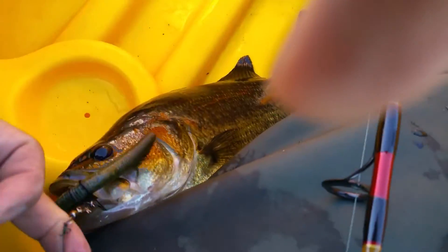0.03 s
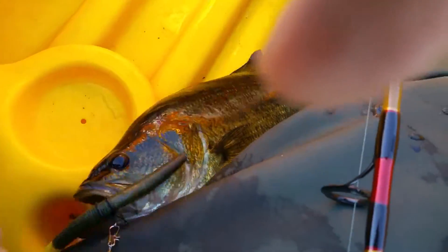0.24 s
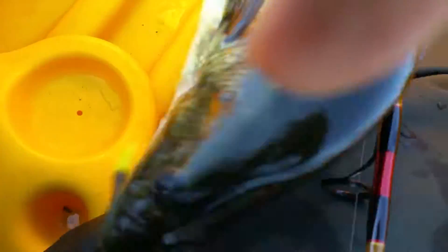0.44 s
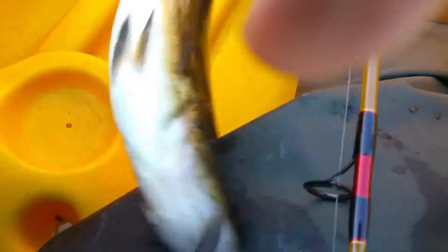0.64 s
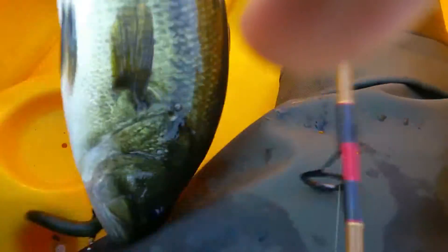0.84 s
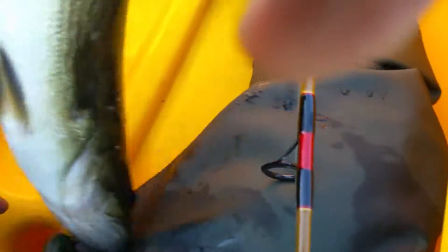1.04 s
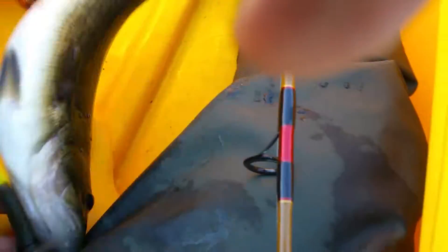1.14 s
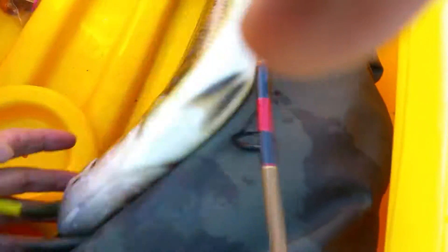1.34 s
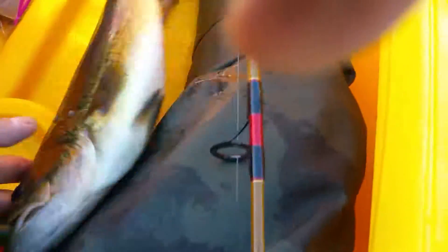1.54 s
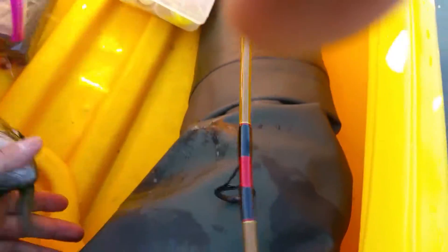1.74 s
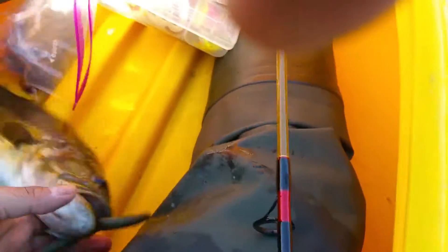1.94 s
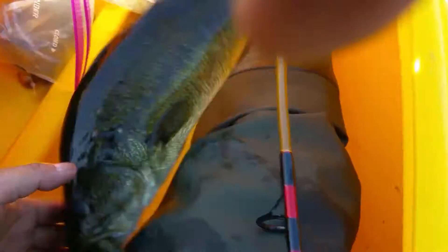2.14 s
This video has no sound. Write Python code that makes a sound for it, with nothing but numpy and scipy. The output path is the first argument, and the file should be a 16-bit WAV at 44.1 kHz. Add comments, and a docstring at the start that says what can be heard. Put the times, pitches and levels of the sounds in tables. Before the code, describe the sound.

A freshly caught fish thrashes, slapping wetly and thumping against a hollow plastic kayak hull

```python
"""Cockpit of a plastic kayak on a lake: a freshly caught fish thrashes close to the microphone. Its wet body
slaps the deck (crackling noise bursts) and thumps the hollow hull (low modes, rumble). Sharp knocks ring the
deck (tone, narrow noise); the lure clacks on it (short modes, echo). Between blows it slithers over rubber
waders (grainy wet noise) and squeaks (falling tones). Faint lake air (steady noise) and small water drips
(short rings) lie underneath."""
import sys
import numpy as np
from scipy import signal
from scipy.fft import rfft, irfft
from scipy.io import wavfile

SR = 44100
rng = np.random.default_rng(int(sys.argv[2]) if len(sys.argv) > 2 else 0)


def dump(signal):
    """Clip the signal to [-1, 1] and save it as 16-bit WAV at the path in sys.argv[1]."""
    limited = np.clip(np.atleast_2d(signal).T, -1, 1)
    pcm = np.round(limited * 32767).astype(np.int16)
    wavfile.write(sys.argv[1], SR, pcm)


N = 96402
TIME_S = np.arange(N) / SR
CUTOFF_HZ = 16000

# Stereo pickup. Each row: frequency in Hz, left-right correlation from -1 to 1.
STEREO_CORRELATION = [(60, 0.97), (200, 0.96), (400, 0.93), (750, 0.67), (1400, -0.23), (2800, -0.056),
                      (6000, -0.065), (16000, 0.19)]
# Channel balance. Each row: frequency in Hz, left minus right in dB.
MIC_BALANCE = [(200, 1), (700, 6), (1300, 0), (2400, -6.5), (4400, 6), (8000, 12), (15000, 1)]

# Lake air spectrum. Each row: frequency in Hz, relative density in dB per Hz.
AIR_COLOUR = [(25, -79), (55, 9.5), (100, 6.5), (180, 2.5), (300, -8), (850, -8), (1400, -12.5),
              (3000, -23.5), (6500, -27), (8500, -39), (16000, -32.5)]
AIR_DB = -39
DRIPS_PER_S, DRIP_DB, DRIP_T60_CYCLES = 54, -52, 14

# Strokes of the slithering fish. Each row: start in seconds, level in dB, swell in seconds,
# t60 in seconds, hiss gain above 3 kHz in dB.
SLITHERS = [(-.01, -37.5, .01, 0.34, -1), (.16, -43.5, 0.21, 0.71, -26), (0.391, -37.5, 0.006, 0.9, 1),
            (0.409, -26.5, 0.054, 0.24, 0.5), (0.506, -33, 0.026, 0.026, -18), (0.679, -43, 0.012, 0.47, 4),
            (0.838, -25, 0.006, 0.51, 0.5), (0.997, -26, 0.013, 0.054, 1), (1.12, -42, 0.057, 0.94, 0),
            (1.283, -34, 0.0023, 0.32, -8), (1.317, -26, 0.034, 0.38, 3.5), (1.683, -28.5, 0.034, 0.66, -7),
            (1.85, -41, 0.031, 0.47, 10), (1.975, -35, 0.0034, 0.19, 12), (1.997, -34.5, 0.018, 0.45, 8),
            (2.048, -32.5, 0.041, 0.12, 12.5)]
# Rubbing spectrum, also used for the knocks. Each row: frequency in Hz, relative density in dB per Hz.
SLITHER_COLOUR = [(60, -26), (200, 8.5), (450, -1), (850, -2), (1200, -6), (2300, -6), (3800, -14),
                  (6500, -16.5), (8200, -28.5), (16000, -25.5)]
GRAINS_PER_S, GRAIN_DECAY_S, GRAIN_SPREAD_DB = 600, 0.0015, 4.5
SLITHER_GRAIN_SHARE, SLAP_GRAIN_SHARE = 0.69, 0.28  # of power
BUBBLES_PER_S, BUBBLE_Q, BUBBLE_SHARE = 260, 9, 0.6  # rate per pitch; share of power

# Wet skin squeaks. Each row: start in seconds, level in dB, start pitch in Hz, end pitch in Hz,
# length in seconds.
SQUEAKS = [(0.816, -32, 803, 447, 0.022), (1.36, -32.5, 2000, 1550, 0.0274),
           (2.063, -20.5, 4270, 1477, 0.018)]

# Knocks and rings of the deck. Each row: start in seconds, level in dB, pitch in Hz, t60 in seconds.
KNOCKS = [(.602, -29, 1893, 0.067), (0.758, -24.5, 374, 0.1), (.802, -14, 870, 0.077),
          (.803, -16, 554, 0.085), (.837, -18.5, 500, 0.069), (.897, -21, 393, 0.1),
          (1.0035, -17, 695, 0.033), (1.004, -14.5, 265, 0.057), (1.108, -30.5, 389, 0.068),
          (1.287, -10.5, 380, 0.025), (1.354, -28, 528, 0.1), (1.396, -28, 462, 0.19),
          (1.385, -24, 856, 0.015), (1.402, -21, 2028, 0.1), (1.439, -14, 860, 0.018),
          (1.502, -21.5, 2054, 0.097), (1.707, -26.5, 1140, 0.03), (1.732, -13.5, 907, 0.044),
          (1.735, -15, 1200, 0.037), (1.788, -23, 433, 0.1), (2.068, -19, 397, 0.16)]
KNOCK_RISE_S, KNOCK_Q, KNOCK_TONE_DB, KNOCK_CLUSTER_DB = 0.0012, 1.8, -3.5, -9

# Lure hitting the deck. Each row: start in seconds, level in dB.
CLACKS = [(0.5651, -4), (0.6609, -5.5), (.7530, -7.5), (0.9843, -8.5), (1.108, -34), (1.1585, -40),
          (1.435, -14.5), (1.602, -17), (1.8730, -19)]
# Modes of the lure. Each row: frequency in Hz, level in dB, t60 in seconds.
LURE_MODES = [(1836, -21.5, 0.066), (2180, -16.5, 0.047), (2740, -17, 0.056), (2646, -7, 0.019),
              (2960, -11.5, 0.0034), (4730, -17, 0.013), (5800, -27, 0.013)]
# Cockpit's answer to a clack. Each row: frequency in Hz, relative density in dB per Hz.
CLACK_ECHO_COLOUR = [(120, 1), (250, 17), (390, 2), (600, 1.5), (1200, -9), (1850, 0.5), (2700, 6),
                     (4200, -3.5), (6500, -3.5), (8200, -24), (16000, -30)]
CLACK_RISE_S, CLACK_PAN_DB = 0.0006, -15
CLACK_ECHO_DB, CLACK_ECHO_T60_S, CLACK_SNAP_DB, CLACK_SNAP_T60_S = -11, 0.081, -26, 0.006

# Body landing on the hull. Each row: start in seconds, level in dB, pitch in Hz, hold in seconds.
THUMPS = [(0.401, -19.5, 78, 0.0093), (0.467, -20, 84, 0.0052), (.572, -23, 178.6, 0.047),
          (.663, -26.5, 147.4, 0.062), (0.752, -27, 132, .003), (.804, -16, 182.8, .003),
          (.834, -9, 135.4, 0.022), (.906, -7.5, 159.1, 0.0068), (.94, -23.5, 136, .003),
          (1, -20.5, 144.5, .006), (1.293, -16.5, 112.4, 0.0049), (1.359, -16.5, 122.5, 0.0024),
          (1.402, -14.5, 162.8, 0.017), (1.478, -18.5, 117, 0.0024), (1.502, -18, 159.5, 0.015),
          (1.612, -27.5, 132, 0.0054), (1.732, -11, 184, 0.011), (1.758, -12, 117.6, .004),
          (1.790, -8, 155, 0.017), (1.894, -33.5, 130, .02), (2.081, -11.5, 192, 0.016),
          (2.098, -14.5, 124, 0.0039)]
# Modes of the hull. Each row: multiple of the thump's pitch, level in dB.
HULL_MODES = [(0.598, -8), (0.801, -14.5), (0.999, -1.5), (1.351, -15.5), (2.5, -26.5)]
# Loose hull rumble. Each row: frequency in Hz, relative density in dB per Hz.
SHUDDER_COLOUR = [(25, -38), (45, -33), (75, 3), (190, 1.5), (290, -10), (430, -11.5), (700, -45.5),
                  (1500, -51.5)]
HULL_RISE_S, HULL_T60_S, HULL_PAN_DB = 0.008, 0.14, 2.5
SHUDDER_DB, SHUDDER_T60_S = -15, 0.42

# Wet slaps. Each row: start in seconds, level in dB, sizzle gain at 3.6-7.2 kHz in dB,
# spray gain above 7.2 kHz in dB, rise in seconds, t60 in seconds, pan as left minus right in dB,
# pitch of the struck panel in Hz.
SLAPS = [(0.8, -9, -3, -1.5, 0.0031, 0.068, -0.5, 2213), (0.8297, -20, 2, -1, 0.005, 0.063, -2.5, 2720),
         (0.877, -20.5, -9, -6, 0.0007, 0.053, 8, 2160), (0.8844, -7.5, 0, -5, 0.00038, 0.039, -1, 2051),
         (0.895, -7.5, 1, -10, 0.00077, 0.057, -2.5, 2645), (0.9197, -20, 7.5, 3, 0.0004, 0.083, -4, 2550),
         (1.3318, -28, 2.5, 11, 0.00083, 0.05, 1.5, 2750), (1.3494, -15, 0.5, -3, 0.0054, 0.051, -2, 1693),
         (1.3950, -15, 0.5, -9, 0.0016, 0.11, -2, 1600), (1.404, -23, -8, 0, 0.0012, 0.097, -4, 2600),
         (1.4552, -22, -4.5, -20, 0.0019, 0.068, -1, 2800), (1.4916, -16, -1, 0, 0.002, 0.029, -3, 1758),
         (1.499, -19, 5, -0.5, 0.0016, 0.07, -1, 2080), (1.677, -26, -6.5, -9.5, 0.0072, 0.055, -1.5, 2495),
         (1.7160, -45.5, 14.5, 18, 0.0031, 0.14, 6, 3780), (1.7312, -9.5, -2, -2, 0.00058, 0.057, 0, 2250),
         (1.781, -12, 2, -3.5, 0.003, 0.13, -1.5, 1604), (1.8900, -24.5, 0.5, -1, 0.0022, 0.077, 0.5, 2980),
         (2.0643, -17, 6, 4, 0.00083, 0.092, -5, 2570), (2.086, -21.5, -1.5, -20, 0.0092, 0.13, -3, 1770),
         (2.1290, -22.5, 3, -2.5, 0.00075, 0.082, -5.5, 2800)]
# Slap spectrum. Each row: frequency in Hz, relative density in dB per Hz.
SLAP_COLOUR = [(150, 2), (400, -6.5), (900, -8.5), (1300, -7), (1650, 0.5), (2200, -1), (2650, 0),
               (3900, -4), (5000, -5), (6600, -4), (8000, -13.5), (16000, -12)]
CRACK_DB, CRACK_T60_S = -17, 0.031  # first instant of contact
PANEL_DB, PANEL_T60_S, SPRAY_T60_RATIO = -13, 0.072, 0.77


def from_db(db):
    """Amplitude gain of a level in dB."""
    return 10 ** (np.asarray(db) / 20)


def rms_one(x):
    """Scale to rms 1."""
    return x / np.sqrt(np.mean(x ** 2) + 1e-20)


def at_hz(points, hz):
    """Interpolate a table on a log-frequency axis."""
    table = np.array(points)
    return np.interp(np.log(hz + 1e-9), np.log(table[:, 0]), table[:, 1])


def pan(left_minus_right_db):
    """Constant-power left and right gains."""
    gains = np.vstack([from_db(left_minus_right_db / 2), from_db(-left_minus_right_db / 2)])
    return gains / np.sqrt(np.mean(gains ** 2, axis=0))


def treble(x, hz):
    """Part of a sound above a frequency, without phase shift."""
    return signal.sosfiltfilt(signal.butter(4, hz, "high", fs=SR, output="sos"), x)


def blow(start_s, rise_s, t60_s, hold_s=0):
    """Envelope of a blow: smooth rise, hold, exponential decay."""
    age_s = TIME_S - start_s
    rise = np.sin(np.pi / 2 * np.clip(age_s / rise_s, 0, 1)) ** 2
    decay = np.exp(-np.log(1000) * np.clip((age_s - rise_s - hold_s) / t60_s, 0, 2))
    return rise * decay


def ring(start_s, hz, rise_s, t60_s):
    """One struck mode: a decaying sine."""
    return np.sin(2 * np.pi * hz * (TIME_S - start_s)) * blow(start_s, rise_s, t60_s)


def bubbles(pitches=30):
    """Water film bursting into tiny bubbles: random pops excite resonances; even spectrum, rms 1."""
    out = 0
    for hz in np.geomspace(300, CUTOFF_HZ, pitches):
        chance = rng.uniform(-1, 1, (2, N))
        pops = np.sign(chance) * (np.abs(chance) < BUBBLES_PER_S / SR)
        resonance = signal.iirpeak(hz, BUBBLE_Q, fs=SR)
        out = out + np.sqrt(hz) * rms_one(signal.lfilter(*resonance, pops + 1e-18))
    return rms_one(out)


def noise(colour, wet=False):
    """Coloured noise as two microphones hear it, smooth or wet with bubbles; rms 1."""
    hz = np.arange(N // 2 + 1) * SR / N
    source = rng.standard_normal((2, N))
    if wet:
        source = np.sqrt(1 - BUBBLE_SHARE) * source + np.sqrt(BUBBLE_SHARE) * bubbles()
    mid, side = rfft(source)
    alike = at_hz(STEREO_CORRELATION, hz)
    stereo = np.sqrt(1 + alike) * mid + np.sqrt(1 - alike) * side * [[1], [-1]]
    coloured = stereo * from_db(at_hz(colour, hz)) * pan(at_hz(MIC_BALANCE, hz))
    return rms_one(irfft(coloured, N))


def grains(share):
    """Crackling gain as wet skin sticks and lets go: random power bursts that decay; rms 1."""
    sizes = from_db(GRAIN_SPREAD_DB * np.minimum(rng.exponential(1, N), 3))
    releases = rng.random(N) < GRAINS_PER_S / SR
    decay = np.exp(-1 / (GRAIN_DECAY_S * SR))
    power = signal.lfilter([1], [1, -decay], sizes ** 2 * releases + 1e-18)
    return np.sqrt(1 - share + share * power / power.mean())


def air():
    """Open lake air: steady noise, mostly low."""
    return from_db(AIR_DB) * noise(AIR_COLOUR)


def drips():
    """Small random drips and laps of water, each ringing a few cycles."""
    rows = rng.random((int(DRIPS_PER_S * N / SR), 3))
    out = 0
    for (when, size, side), hz in zip(rows, np.geomspace(600, 1600, len(rows))):
        drip = ring(when * N / SR, hz, 2 / hz, DRIP_T60_CYCLES / hz)
        out = out + size ** 2 * pan(2 * side - 1) * drip
    return from_db(DRIP_DB) * out


def slithers(hiss_hz=3000):
    """Scales rub wet rubber and plastic: grainy strokes swell and fade, some more hissy."""
    rub = noise(SLITHER_COLOUR, wet=True) * grains(SLITHER_GRAIN_SHARE)
    hiss = treble(rub, hiss_hz)
    body, out = rub - hiss, 0
    for start_s, db, swell_s, t60_s, hiss_db in SLITHERS:
        out = out + from_db(db) * blow(start_s, swell_s, t60_s) * (body + from_db(hiss_db) * hiss)
    return out


def squeaks():
    """Sliding skin squeaks: a tone swells, falls in pitch and fades."""
    out = 0
    for start_s, db, start_hz, end_hz, length_s in SQUEAKS:
        along = np.clip((TIME_S - start_s) / length_s, 0, 1)
        hz = start_hz * (end_hz / start_hz) ** along
        tone = np.sin(np.pi * along) * np.sin(2 * np.pi * np.cumsum(hz) / SR)
        out = out + from_db(db) * pan(at_hz(MIC_BALANCE, hz)) * tone
    return out


def knocks():
    """A knock rings one deck resonance and stirs its neighbours, as narrow-band noise."""
    stir, out = noise(SLITHER_COLOUR), 0
    for start_s, db, hz, t60_s in KNOCKS:
        peak = signal.iirpeak(hz, KNOCK_Q, fs=SR)
        narrow = rms_one(signal.lfilter(*peak, signal.lfilter(*peak, stir)))
        cluster = narrow * blow(start_s, KNOCK_RISE_S, t60_s)
        tone = pan(at_hz(MIC_BALANCE, hz)) * ring(start_s, hz, KNOCK_RISE_S, t60_s)
        out = out + from_db(db) * (from_db(KNOCK_TONE_DB) * tone + from_db(KNOCK_CLUSTER_DB) * cluster)
    return out


def clacks():
    """Lure snaps and rings briefly on the right; the cockpit answers with wide, decaying noise."""
    echo, snap, out = noise(CLACK_ECHO_COLOUR), rng.standard_normal(N), 0
    for start_s, db in CLACKS:
        direct = from_db(CLACK_SNAP_DB) * snap * blow(start_s, CLACK_RISE_S, CLACK_SNAP_T60_S)
        for hz, mode_db, t60_s in LURE_MODES:
            direct = direct + from_db(mode_db) * ring(start_s, hz, CLACK_RISE_S, t60_s)
        answer = from_db(CLACK_ECHO_DB) * echo * blow(start_s, CLACK_RISE_S, CLACK_ECHO_T60_S)
        out = out + from_db(db) * (pan(CLACK_PAN_DB) * direct + answer)
    return out


def thumps():
    """Soft, heavy body booms the hollow hull, pitched by where it lands; a loose rumble outlasts it."""
    shudder, out = from_db(SHUDDER_DB) * noise(SHUDDER_COLOUR), 0
    for start_s, db, hz, hold_s in THUMPS:
        modes = 0
        for ratio, mode_db in HULL_MODES:
            modes = modes + from_db(mode_db) * np.sin(2 * np.pi * hz * ratio * (TIME_S - start_s))
        boom = pan(HULL_PAN_DB) * modes * blow(start_s, HULL_RISE_S, HULL_T60_S, hold_s)
        rumble = shudder * blow(start_s, HULL_RISE_S, SHUDDER_T60_S, hold_s)
        out = out + from_db(db) * (boom + rumble)
    return out


def slaps(sizzle_hz=3600, spray_hz=7200):
    """Wet skin hits a panel: a crack, a crackling burst, quicker-dying spray and a brief panel ring."""
    burst = noise(SLAP_COLOUR, wet=True) * grains(SLAP_GRAIN_SHARE)
    upper, spray = treble(burst, sizzle_hz), treble(burst, spray_hz)
    body, sizzle, out = burst - upper, upper - spray, 0
    for start_s, db, sizzle_db, spray_db, rise_s, t60_s, pan_db, panel_hz in SLAPS:
        crack = from_db(CRACK_DB) * blow(start_s, rise_s, CRACK_T60_S)
        smack = (body + from_db(sizzle_db) * sizzle) * (crack + blow(start_s, rise_s, t60_s))
        spray_envelope = crack + blow(start_s, rise_s, t60_s * SPRAY_T60_RATIO)
        smack = smack + from_db(spray_db) * spray * spray_envelope
        panel = from_db(PANEL_DB) * ring(start_s, panel_hz, rise_s, PANEL_T60_S)
        out = out + from_db(db) * pan(pan_db) * (smack + panel)
    return out


def scene():
    """The fish in the boat, over the water and open air of the lake."""
    background = air() + drips()
    return background + slithers() + squeaks() + knocks() + clacks() + thumps() + slaps()


def record(dry):
    """Round the highest peaks, then cut the top."""
    rounded = 0.9 * np.tanh(dry / 0.9)
    low_pass = signal.cheby2(14, 70, CUTOFF_HZ + 600, fs=SR, output="sos")  # 70 dB down at the edge
    return signal.sosfilt(low_pass, rounded)


dry = scene()
out = record(dry)
dump(out)
```